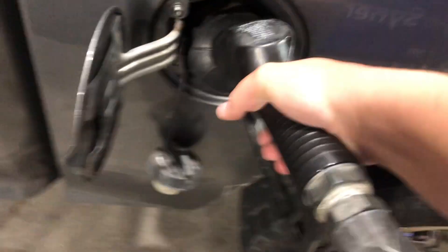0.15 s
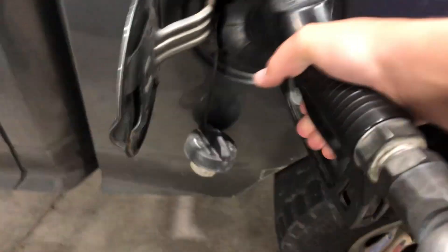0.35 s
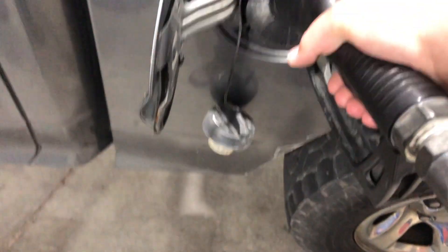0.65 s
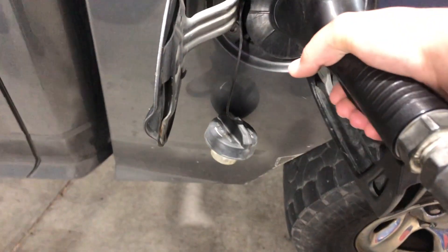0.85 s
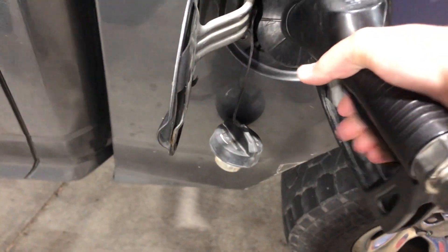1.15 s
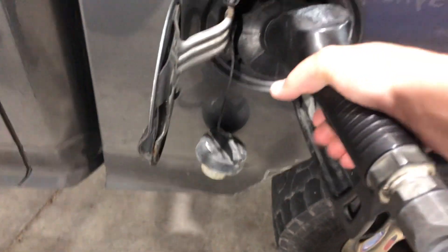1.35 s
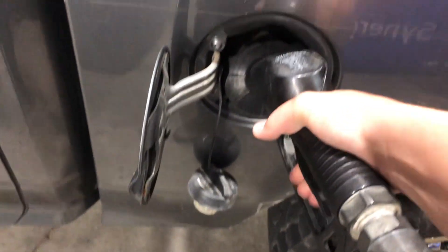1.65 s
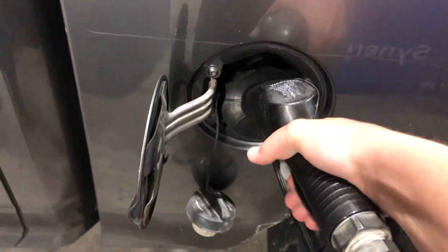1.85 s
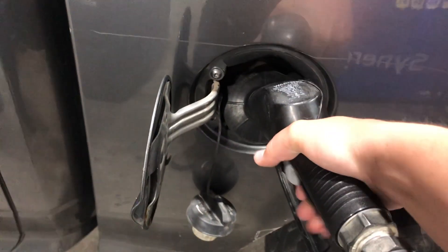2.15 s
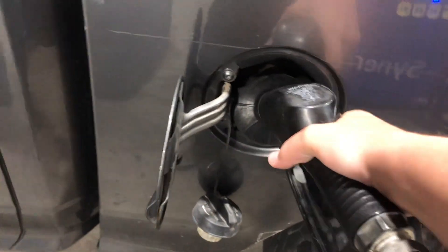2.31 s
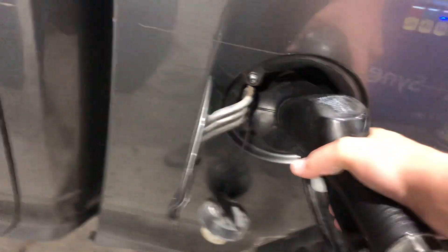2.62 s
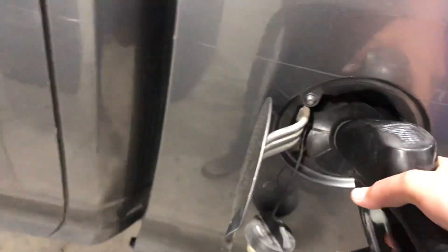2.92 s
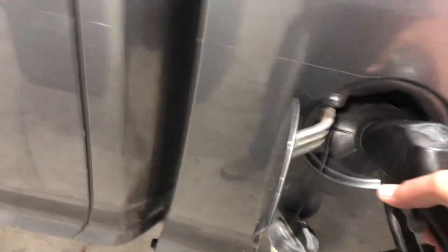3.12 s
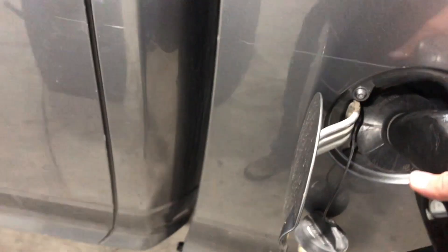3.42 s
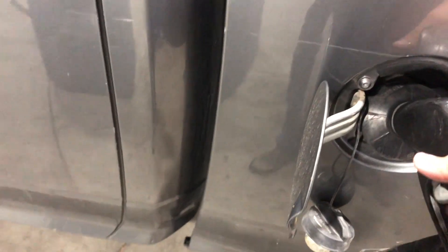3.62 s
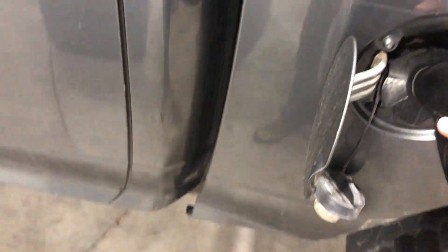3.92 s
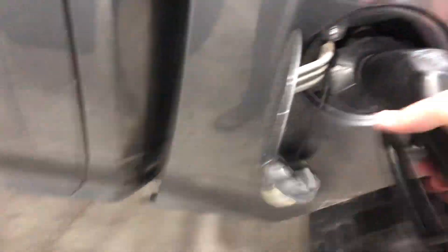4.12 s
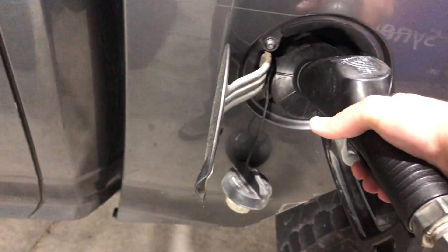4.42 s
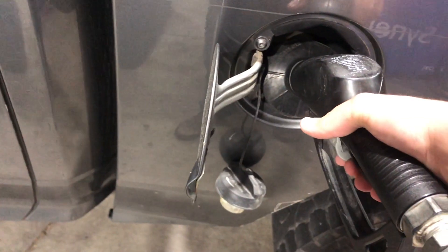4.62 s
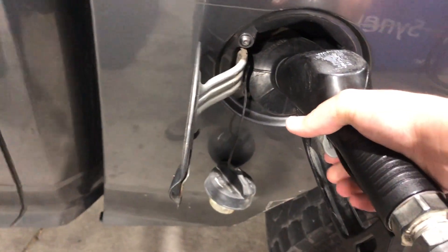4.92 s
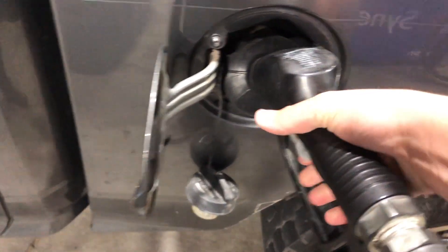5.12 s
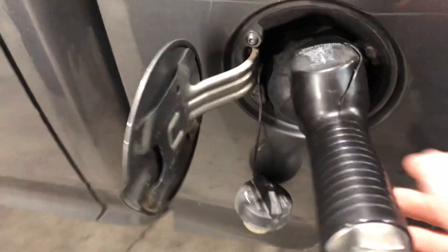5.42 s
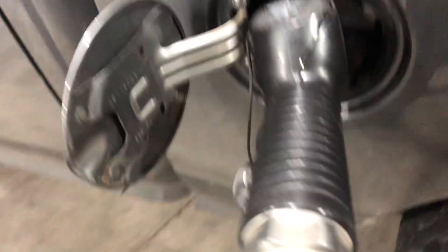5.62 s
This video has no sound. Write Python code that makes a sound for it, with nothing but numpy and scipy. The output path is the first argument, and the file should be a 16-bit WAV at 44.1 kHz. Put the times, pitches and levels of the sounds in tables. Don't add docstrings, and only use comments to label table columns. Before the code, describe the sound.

A metal fuel nozzle is shaken hard in a filler neck with rapid bright clacking, then abruptly quiet, faint ticks, soft bumps and a ratcheting rubber creak.

```python
import sys
import numpy as np
from scipy import signal
from scipy.io import wavfile
from scipy.ndimage import uniform_filter1d, minimum_filter1d

SR = 44100
rng = np.random.default_rng(int(sys.argv[2]) if len(sys.argv) > 2 else 0)


def wrap_up_sound(samples):
    columns = np.atleast_2d(samples).T
    tamed = np.clip(columns, -1, 1)
    steps = np.round(tamed * 32767).astype(np.int16)
    wavfile.write(sys.argv[1], SR, steps)


def volts(x):
    e = np.asarray(x, float) / 20
    return 10 ** e


N = 253619
CUT_S = 4.053


def evened(x):
    return x / np.sqrt(np.mean(x ** 2) + 1e-20)


def read(points, hz):
    f, value = np.transpose(points)
    return np.interp(np.log(hz + 1), np.log(f + 1), value)


def follow(rows):
    s, *columns = np.transpose(rows)
    return [np.interp(np.arange(N) / SR, s, c) for c in columns]


def add(mix, s, sound):
    part = mix[max(round(s * SR), 0):][:len(sound)]
    part += sound[:len(part)]


def passband(x, lo_hz, hi_hz, order=2):
    sos = signal.butter(order, [lo_hz, min(hi_hz, .45 * SR)], "band", fs=SR, output="sos")
    return signal.sosfilt(sos, x)


def noise(spectrum, patchy_db, lo_hz, hi_hz):
    frames, hz = N // 256 + 5, np.fft.rfftfreq(1024, 1 / SR)
    a, b, patches = rng.standard_normal((frames, 513, 3)).T
    patches = uniform_filter1d(patches, size=10, axis=0)
    patches = evened(uniform_filter1d(patches, size=10, axis=1))
    gain = volts(read(spectrum, hz))
    z = (a + 1j * b) * gain[:, None] * volts(patchy_db * patches)
    x = signal.istft(z, nperseg=1024, noverlap=768)[1][:N]
    in_band = (hz > lo_hz) & (hz < hi_hz)
    return evened(x) * np.sqrt(np.sum(gain ** 2) / np.sum(gain[in_band] ** 2))


def ring(modes, luck, spread_db, detune, size=1500):
    hz, db, t60 = np.transpose(modes)[:, :, None]
    t = np.arange(size) / SR
    strength, pitch, phase = luck.reshape(3, -1, 1)[:, :len(modes)]
    decay = volts(db + spread_db * strength - 60 * t / np.minimum(t60, .03))
    tones = decay * np.sin(2 * np.pi * (hz * (1 + detune * pitch) * t + phase))
    return evened(tones.sum(0) * (1 - np.exp(-t / 0.00031)))


def struck(modes, luck, taps, chatter, db, lo_hz, hi_hz, ring_db):
    rung = signal.fftconvolve(taps, ring(modes, luck, 2.2, .012))[:len(chatter)]
    sound = passband(evened(chatter) + volts(ring_db) * evened(rung), lo_hz, hi_hz)
    return volts(db) * sound / np.sqrt(np.mean(sound[:176] ** 2))


# t/s, neck level/dB, spout level/dB, crack level/dB
STRIKES = [(0.0, -39, -44, -44.5), (0.2559, -30.5, -27.5, -39), (0.4942, -30, -25, -33),
           (0.7069, -30.5, -22.5, -23), (0.9147, -32, -26, -28), (1.1434, -32.5, -26, -26.5),
           (1.3629, -31.5, -29, -26.5), (1.5841, -30.5, -23.5, -23), (1.7835, -29, -25, -24.5),
           (1.9572, -42, -50, -36), (2.1455, -25, -22.5, -24), (2.2845, -26.5, -23, -22),
           (2.4435, -24.5, -22.5, -20.5), (2.5581, -26.5, -24.5, -20.5), (2.7041, -26.5, -22, -16.5),
           (2.8461, -24.5, -23, -18.5), (2.9923, -25, -25, -19.5), (3.173, -27, -23, -18.5),
           (3.3606, -22.5, -21.5, -20), (3.582, -27, -22, -23.5), (3.8342, -28, -24, -25.5)]
BOUNCES = [(0.016, -42.5, -46, -53), (0.2703, -28, -27.5, -29.5), (0.508, -31, -28.5, -24),
           (0.718, -31, -32, -33), (0.9375, -28.5, -28.5, -27.5), (1.159, -35.5, -35, -31),
           (1.3818, -29, -30, -28), (1.603, -26, -30, -25), (1.6193, -29.5, -31, -32),
           (1.8013, -28, -32, -25.5), (1.9628, -26, -22.5, -22.5), (1.9887, -27.5, -26, -27.5),
           (2.1686, -24, -27, -22.5), (2.3079, -24, -25, -25), (2.325, -26.5, -27.5, -26),
           (2.566, -30.5, -40, -38.5), (2.5783, -27, -25.5, -22.5), (2.727, -29.5, -27.5, -26),
           (2.8714, -29.5, -26, -25.5), (3.017, -28.5, -21, -21.5), (3.031, -27.5, -38, -28),
           (3.1917, -25, -22.5, -20.5), (3.208, -29, -33, -31), (3.38, -25, -27.5, -27),
           (3.6016, -23.5, -22.5, -20.5), (3.6357, -32.5, -29, -31), (3.6545, -43, -31, -29),
           (3.865, -32.5, -32.5, -36)]
RETURNS = [(0.0902, -31, -36, -27.5), (0.3568, -32.5, -34.5, -26.5), (0.5947, -33.5, -29.5, -27),
           (0.792, -32.5, -29, -25.5), (1.001, -33, -38, -24.5), (1.2342, -31.5, -32, -24.5),
           (1.4517, -30.5, -33.5, -23), (1.665, -31, -35.5, -24), (1.8535, -31.5, -35.5, -26.5),
           (2.0451, -32, -35, -24), (2.3631, -33, -40, -21.5), (2.785, -26, -26.5, -28),
           (3.0746, -32, -35, -22.5), (3.241, -32.5, -33, -32), (3.4456, -32, -32, -38.5),
           (3.482, -31.5, -33, -23.5), (3.6799, -31.5, -36, -22), (3.9156, -36.5, -35, -38),
           (3.9478, -35, -51, -22.5)]
HOPS = [(0.52, -32.5, -32, -37), (0.73, -35, -35, -43), (1.174, -38, -48.5, -43.5), (1.19, -38, -41, -46),
        (1.3952, -34.5, -37, -41), (1.408, -36, -43, -44), (2.0059, -33.0, -37, -36),
        (2.5936, -31.5, -37, -35), (3.0566, -39, -34, -32), (3.3937, -28.5, -46, -43),
        (3.425, -36, -46, -50), (3.618, -39, -46, -42), (3.6281, -34, -47, -43), (3.8977, -40.5, -45, -51)]
# t/s, neck level/dB, crack level/dB
PLAY = [(0.067, -71, -61), (.2164, -72, -74), (.2324, -72, -65), (.554, -44, -67), (0.97, -55, -52),
        (1.546, -51, -57), (2.464, -39.5, -63), (2.8648, -37.5, -69), (2.9, -44, -72), (3.071, -45, -44),
        (3.7814, -49, -60), (0.6074, -56, -49), (1.11, -44.5, -39), (1.2446, -63, -38), (1.266, -69, -55),
        (1.4876, -70, -46), (1.7458, -48, -51), (1.9017, -38, -41.5), (2.0575, -60, -45),
        (2.1048, -46, -46), (2.25, -41.5, -39.5), (2.269, -41, -41), (2.55, -47, -63), (2.963, -53.5, -57),
        (3.272, -44.5, -38.5), (3.3448, -47.5, -46), (3.465, -41, -40), (3.49, -59, -40),
        (3.5688, -62, -44.5), (3.693, -55, -51), (3.739, -63, -54), (3.8194, -49, -46), (3.933, -45, -54),
        (3.96, -60, -37), (3.984, -83.5, -42)]
# t/s, latch level/dB, crack level/dB
TICKS = [(4.07, -57, -63), (4.093, -58, -68), (4.343, -72, -64), (4.356, -57, -70), (4.485, -59, -74),
         (4.5015, -62, -71), (4.7034, -69, -71), (4.8345, -63, -75), (4.5678, -33, -45), (4.573, -60, -65),
         (4.582, -58, -66), (4.686, -75, -72), (4.619, -52, -62), (4.779, -54.5, -78), (5.056, -63, -59.5),
         (5.078, -66, -62), (5.1065, -60, -57), (5.6537, -58, -73), (5.686, -54, -69)]
# t/s, neck level/dB, crack level/dB
RATTLES = [(.1197, -49, -48), (.281, -37, -44), (.5325, -46, -55), (.739, -35.5, -46), (0.75, -38, -51),
           (.9257, -43, -43), (1.115, -44, -46), (1.1797, -40, -44), (1.4186, -44, -54), (1.425, -43, -47),
           (1.469, -52, -43), (1.6269, -38, -36), (1.695, -47, -46), (1.7014, -53, -49), (1.869, -50, -41),
           (1.8836, -47, -48), (1.981, -43, -39), (2.013, -41, -48), (2.081, -50, -45), (2.129, -29, -35),
           (2.2027, -43, -56), (2.2777, -45, -51), (2.4748, -38.5, -55), (2.6056, -41, -51),
           (2.614, -43, -51.5), (2.7433, -42, -49), (2.805, -49, -54.5), (3.0134, -38, -37.5),
           (3.105, -47, -46), (3.111, -50, -46), (3.2198, -38, -38), (3.402, -44, -39), (3.494, -41, -37),
           (3.512, -47, -51), (3.648, -31, -48), (3.7158, -49, -46), (3.8585, -45, -50)]
SPOUT_LIFT_DB = [1.5, -12.5, -2.5]


def blows():
    hits = []
    for rows in [STRIKES, BOUNCES, RETURNS, HOPS]:
        hits += [(*row, rows is RETURNS, rows is STRIKES) for row in rows]
    for rows, lift in zip([PLAY, TICKS, RATTLES], SPOUT_LIFT_DB):
        hits += [(s, neck, (neck + crack) / 2 + lift, crack, False, False) for s, neck, crack in rows]
    return hits


# f/Hz, level/dB, t60/s
NECK = [(1390, -4.5, .015), (1920, -5, .015), (2211, -1.5, 0.022), (2590, -5, .015), (2924, 2, 0.017),
        (3308, 0.5, 0.023), (3660, -2, 0.023), (4000, 0, 0.025), (4146, -2.5, 0.067), (4430, -4, 0.011),
        (5060, 2.5, .012)]
# f/Hz, level/dB, t60/s
SPOUT = [(5540, -3, 0.0079), (6340, -5, .006), (6780, 4.5, 0.0064), (7100, -2, 0.011), (7840, -6.5, 0.0048),
         (8380, -10, 0.01)]
# f/Hz, level/dB, t60/s
CRACK = [(10000, -3, .006), (10700, -1, .006), (11500, 1, .006), (12500, -2, .005), (13400, -2, .004),
         (14200, 0, .004), (15100, 0, .005)]
# f/Hz, level/dB, t60/s
LATCH = [(1900, -7.5, 0.019), (3640, 0, 0.018), (4200, 1, 0.0088), (5060, -7, 0.0046)]
# f/Hz, level/dB, t60/s
FAR_LOW = [(3290, 3.3, 0.032), (3790, 4.6, 0.0138), (4004, 4.8, 0.03), (4410, 12, 0.015),
           (4900, 5.2, 0.0061)]
FAR_HIGH = [(6040, -13.5, 0.0079), (7690, 1.5, 0.0039), (8960, 1.5, 0.0057)]
FAR_CRACK = [(10630, -7.5, 0.0044), (11770, 2.5, 0.0045), (12700, -5, .003), (14040, 0.5, .004),
             (14660, 2, 0.0033)]


def knocks():
    out, t, hits = np.zeros(N), np.arange(2600) / SR, blows()
    luck = rng.standard_normal((len(hits), 4, 36))
    grit = rng.standard_normal((len(hits), 3, 2600))
    loose = rng.random((len(hits), 2600)) < 250 / SR
    blow = np.minimum(t / 0.00041, 1) * (np.exp(-(t / 0.0028) ** 2) + 0.073 * np.exp(-t / 0.0038))
    for (s, neck_db, spout_db, crack_db, far, first), l, g, spikes in zip(hits, luck, grit, loose):
        shaking = s < CUT_S
        later = .08 * spikes * abs(g[0, ::-1]) * np.exp(-t / 0.018)
        rebound = round((.0048 + .0004 * l[3, 0]) * SR)
        later[rebound] += (.38 if first else .12) * volts(2.0 * l[3, 1])
        taps = later * shaking + (np.arange(len(t)) == 8)
        force = signal.fftconvolve(taps, blow)[:len(t)]
        chatter = g * force
        taps = taps + 0.069 * chatter
        low_part = FAR_LOW if far else NECK if shaking else LATCH
        high_part = FAR_HIGH if far else SPOUT
        crack_part = FAR_CRACK if far else CRACK
        low_ring_db = 7 if shaking else 9 if neck_db > -45 else -2
        crack_top_hz = 16600 if shaking else 12000
        sound = struck(low_part, l[0], taps[0], chatter[0], neck_db + 2.0, 1100, 7400, low_ring_db)
        sound += struck(high_part, l[1], taps[1], chatter[1], spout_db + 2.0, 5200, 13000, 4.3)
        sound += struck(crack_part, l[2], taps[2], chatter[2], crack_db + 1.5, 7840, crack_top_hz, -1)
        add(out, s - .0007, sound)
    return passband(out, 1500, 23000)


# f/Hz, level/dB, swell time/s (the top comes after 2.2 of these)
PANEL = [
    [(137.2, -9.5, 0.02), (197.3, 2, 0.0092), (222.2, -1.5, 0.017)],
    [(266.2, -5.5, 0.015), (300.7, -6, 0.026), (348.4, -11.5, 0.03)],
    [(397.6, -0.5, 0.015), (606, -9.5, 0.022), (688.5, -3, 0.013), (923, -18, 0.029)],
]
# t/s, low level/dB, middle level/dB, upper level/dB
BOOMS = [(0, -42, -45.5, -50), (0.094, -48, -55.5, -48.5), (0.264, -40.5, -46, -47.5),
         (0.354, -47, -54.5, -47.5), (0.501, -36.5, -44.5, -45), (0.597, -44.5, -50, -49),
         (0.715, -40, -45, -45.5), (0.793, -44, -48, -49), (0.926, -38, -42.5, -46.5),
         (1.005, -48, -52, -51), (1.154, -42, -45, -50), (1.24, -46.5, -49.5, -53.5),
         (1.378, -39, -38, -46.5), (1.444, -47, -42.5, -47), (1.594, -39.5, -39.5, -48.5),
         (1.667, -42.5, -50, -50), (1.786, -39, -42, -46), (1.853, -47, -48, -50.5),
         (1.984, -39.5, -38.5, -47), (2.039, -48, -58, -49), (2.156, -39.5, -40.5, -43.5),
         (2.298, -39, -39, -43.5), (2.359, -46.5, -47, -49.5), (2.457, -40, -41, -46),
         (2.566, -39, -41.5, -49), (2.716, -39.5, -38.5, -46), (2.793, -40, -65, -68),
         (2.867, -40, -37.5, -44.5), (3.002, -37.5, -36, -41), (3.072, -38, -45, -53),
         (3.188, -34.5, -34, -40), (3.246, -43, -37, -50), (3.376, -41, -39, -45.5), (3.443, -45, -37, -47),
         (3.478, -44.5, -43.5, -54.5), (3.59, -38, -38, -42.5), (3.669, -41, -41, -46.5),
         (3.841, -47.5, -41.5, -53.5), (3.916, -51, -43, -51), (3.937, -48, -43.5, -46.5)]


def booms():
    out, t = np.zeros(N), np.arange(7000) / SR
    luck = rng.standard_normal((len(BOOMS), 3, 2, 4))
    grit = rng.standard_normal((len(BOOMS), 7000))
    for (s, *levels), l, g in zip(BOOMS, luck, grit):
        for modes, db, chance in zip(PANEL, levels, l):
            hz, mode_db, top = np.transpose(modes)[:, :, None]
            detune, phase = chance[:, :len(modes), None]
            swell = volts(mode_db) * (t / top) ** 3.15 * np.exp(-1.45 * t / top)
            tone = np.sin(2 * np.pi * (hz * (1 + .025 * detune) * t + phase))
            sound = (swell * tone).sum(0)
            add(out, s, volts(db - 2.5) * sound / np.sqrt(np.mean(sound[600:3000] ** 2)))
        shudder = evened(passband(g, 270, 930, order=1)) * t / 0.011 * np.exp(1 - t / 0.013)
        add(out, s, volts(levels[2] + 4.0) * shudder)
    return out


# f/Hz, level/dB per Hz
TRAFFIC = [(18, -61), (30, -19), (60, -6.5), (134, 0.5), (165, 5), (199, -6.5), (394, -6), (554, -8.5),
           (1070, -10), (1670, -14), (2120, -18), (2350, -21.5), (3310, -29.5), (16000, -57.5)]
# t/s, level/dB
PASSING = [(0.0, -59), (.74, -55), (1.49, -54.5), (2.26, -50), (3.12, -51), (3.6, -48.5), (3.83, -54.5),
           (4.05, -53.5), (4.16, -56), (4.84, -54.5), (5.33, -52.5), (5.75, -50)]


def traffic():
    level_db, = follow(PASSING)
    return volts(level_db) * noise(TRAFFIC, 1.5, 600, 1800)


# f/Hz, level/dB per Hz
RUMBLE = [(30, -25), (50, 10.5), (65, -23), (100, 2.5), (150, -47), (300, -66)]
# t/s, level/dB
HANDLING = [(0.0, -34), (0.06, -45), (1.19, -50), (3.21, -48), (3.65, -43.5), (4.33, -68), (5.75, -50.5)]


def rumble():
    level_db, = follow(HANDLING)
    return volts(level_db - 9.5) * noise(RUMBLE, 0.58, 40, 110)


# f/Hz, level/dB per Hz
SCUFF = [(1500, -30.5), (2500, -24.5), (3200, 4.5), (4200, 5.5), (5500, 2.5), (7000, 2), (14000, 0.5),
         (16000, -7)]
# f/Hz, level/dB per Hz
CLATTER = [(800, -21.5), (1200, -4.5), (2200, 2), (3000, -2), (4000, -24.5)]
# f/Hz, level/dB per Hz
HUSH = [(2060, -4.5), (3500, -13), (4570, -17), (5360, -17), (13800, -23.5), (16000, -16)]
# t/s, level/dB
RESTING = [(4.05, -57), (4.16, -65), (4.84, -66), (5.33, -62.5), (5.49, -55), (5.75, -61)]


def scuffing():
    drag, t = np.zeros(N), np.arange(SR // 3) / SR
    for s, *_, crack_db in STRIKES + RETURNS:
        add(drag, s, volts(crack_db - 11) * np.exp(-t / 0.017))
    idle = volts(-56.5)
    scuff = (drag + idle) * noise(SCUFF, 2.4, 3000, 15000)
    scuff = scuff + volts(-30) * (drag + 2 * idle) * noise(CLATTER, 2.2, 1200, 3000)
    resting_db, = follow(RESTING)
    hush = volts(resting_db - 5) * noise([(2000, -30)] + HUSH, 1.2, 3000, 15000)
    return np.where(np.arange(N) < CUT_S * SR, scuff, hush)


# t/s, f/Hz, length/s, level/dB
SQUEAKS = [(.236, 5000, .015, -52), (.478, 5100, .015, -53), (5.652, 5400, .012, -50),
           (.311, 4080, .015, -43), (2.684, 5300, .018, -44), (2.974, 5200, .012, -44),
           (3.29, 950, .032, -42), (5.651, 1400, .012, -43)]
# t/s, level/dB
CHIRPS = [(.5864, -39), (.7842, -35), (.9935, -37), (1.2254, -41), (1.6565, -40), (1.8427, -35),
          (2.234, -44), (2.3539, -38), (2.6397, -39), (2.767, -38), (2.9185, -38)]


def squeaks():
    out = np.zeros(N)
    spring_hz, chirp_s = 13150, .007
    for s, hz, length, db in SQUEAKS + [(s, spring_hz, chirp_s, db) for s, db in CHIRPS]:
        t = np.arange(0, length, 1 / SR)
        turn = 2 * np.pi * hz * t + 1.2 * np.sin(2 * np.pi * 70 * t)
        tone = np.sin(turn) + .4 * (hz < 1200) * np.sin(2 * turn)
        add(out, s, volts(db + 3) * np.sin(np.pi * t / length) * tone)
    return out


# t/s, length/s, level/dB
SCRAPES = [
    (1.573, 0.0075, -33.5),
    (2.122, 0.019, -25.5),
    (3.163, 0.011, -33),
    (3.99, 0.034, -63),
    (4.39, 0.071, -57),
    (5.638, 0.12, -46.5),
]
# f/Hz, level/dB per Hz
SLIDE = [(710, -23), (1200, -3), (2730, -6), (4200, -16), (5400, -15), (7000, -22), (16000, -26)]


def scrapes():
    spout, boot = np.zeros(N), np.zeros(N)
    for s, length, db in SCRAPES:
        t = np.arange(0, length, 1 / SR)
        drag = volts(db) * np.minimum(t / 0.00064, 1) * (1 - t / length)
        add(spout if s < BOOT_TRAVEL[0][0] else boot, s, drag)
    rubber = noise([(600, -30)] + SLIDE, 1.4, 1870, 5400)
    return spout * noise(SCUFF, 1.8, 3000, 15000) + volts(0.5) * boot * rubber


# t/s, f/Hz, level/dB
BUMPS = [(5.17, 55, -39), (5.21, 60, -38), (5.27, 70.3, -48.5), (5.339, 80, -40), (5.373, 70, -35),
         (5.427, 75, -38), (5.453, 85, -40), (5.511, 65, -37), (5.54, 70, -43), (5.609, 90, -42.5),
         (5.641, 91, -35.5), (5.705, 70, -45)]


def bumps():
    out, cycles = np.zeros(N), 2.8
    for s, hz, db in BUMPS:
        turns = np.arange(-cycles / 2, cycles / 2, hz / SR)
        swell = np.cos(np.pi * turns / cycles) ** 2
        add(out, s - cycles / 2 / hz, volts(db + 2) * swell * np.cos(2 * np.pi * (turns + rng.random())))
    return out


# f/Hz, level/dB per Hz
BOOT = [(600, -24), (1500, 2), (2700, -3), (4000, 0), (6500, -11), (8500, -10), (11000, -21), (13800, -12),
        (16000, -20)]
# f/Hz, level/dB, t60/s
BOOT_RING = [(1100, 0, .018), (1900, 1, .018), (2600, -9, .008), (3350, -3, .012), (4300, -6, .009),
             (6300, -14, .004), (8200, -12, .004), (13800, -19, .005)]
# t/s, ribs past the edge
BOOT_TRAVEL = [(5.2932, 1), (5.3240, 2), (5.3455, 3), (5.364, 4), (5.3935, 6), (5.4164, 8), (5.5075, 16),
               (5.5510, 20), (5.5893, 23), (5.638, 26)]


def creak():
    out, t, rubber = np.zeros(N), np.arange(600) / SR, noise(BOOT, 0.22, 1470, 5000)
    when, ribs = np.transpose(BOOT_TRAVEL)
    slips = np.interp(np.arange(ribs[0], ribs[-1] + 1), ribs, when)
    levels = -43.5 + .6 * rng.standard_normal(len(slips))
    for s, db, luck in zip(slips, levels, rng.standard_normal((len(slips), 24))):
        tick = volts(-8) * np.exp(-t / .001) * rubber[round(s * SR):][:600]
        boot = ring(BOOT_RING, .12 * luck, 10, .08, size=600)
        add(out, s - .0008, volts(db) * np.minimum(t / .0003, 1) * (tick + .5 * boot))
    return out


# f/Hz, t60/s
CANOPY = [(300, 0.18), (2000, 0.14), (4000, 0.13), (8000, 0.044), (15000, 0.04)]


def canopy(x):
    taps = np.zeros((3, SR // 2))
    at = np.arange(200, SR // 2 - 20, 20) + rng.integers(0, 20, (3, (SR // 2 - 201) // 20))
    np.put_along_axis(taps, at, rng.choice([-1., 1.], at.shape), 1)
    hz, t, z = signal.stft(taps, SR, nperseg=256)
    tails = signal.istft(z * volts(-60 * t / read(CANOPY, hz)[:, None]), SR, nperseg=256)[1]
    drift = np.arange(N) / SR * 3.1 + np.arange(3)[:, None] / 3
    turns = np.cos(np.pi * drift) * np.sqrt(2 / 3)
    return signal.fftconvolve(x * turns, tails / np.linalg.norm(tails[0]), axes=1)[:, :N].sum(0)


def scene():
    near = knocks() + squeaks() + scrapes() + creak()
    surroundings = traffic() + rumble() + scuffing() + bumps()
    return (near + volts(-16.5) * canopy(near) + booms() + surroundings)[None]


def roll_off(x):
    return signal.sosfilt(signal.butter(12, 16980, fs=SR, output="sos"), x)


def record(dry):
    power = dry[0] ** 2
    quick_db = 10 * np.log10(abs(uniform_filter1d(power, size=88)) + 1e-12)
    recent_db = 10 * np.log10(abs(uniform_filter1d(np.roll(dry[0], 700) ** 2, size=1200)) + 1e-12)
    over_db = np.clip(np.minimum(1.5 * (quick_db - recent_db - 6), 3 * (quick_db + 29)), 0, 13)
    held_db = -minimum_filter1d(-over_db, size=400, origin=199)
    late_db = signal.lfilter([.03], [1, -.97], np.roll(held_db, 80))
    bass = signal.oaconvolve(dry, signal.firwin(127, 700, fs=SR)[None], "same")
    ducked = bass * volts(-late_db) + (dry - bass) * volts(-.45 * late_db)
    fade = np.minimum(abs(np.arange(N) / SR - CUT_S) / .007, 1) ** 2
    soft = .37 * np.tanh(ducked * fade / .37)
    banded = passband(soft, 36, 21000, order=4)
    wide = signal.oaconvolve(banded, signal.firwin(95, 16250, fs=SR)[None], "same")
    steady = signal.oaconvolve(wide, signal.firwin(401, 15900, fs=SR)[None], "same")
    jump = np.minimum(uniform_filter1d(held_db, size=300) / 4, 1)
    return roll_off(steady + jump * (wide - steady))


dry = scene()
out = record(dry)
wrap_up_sound(out)
```